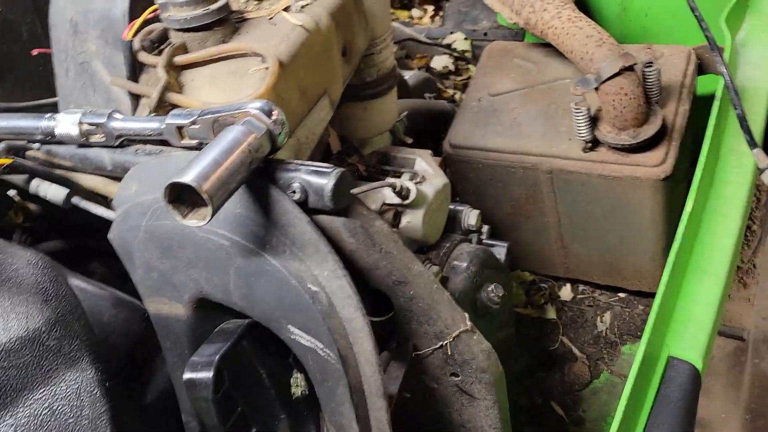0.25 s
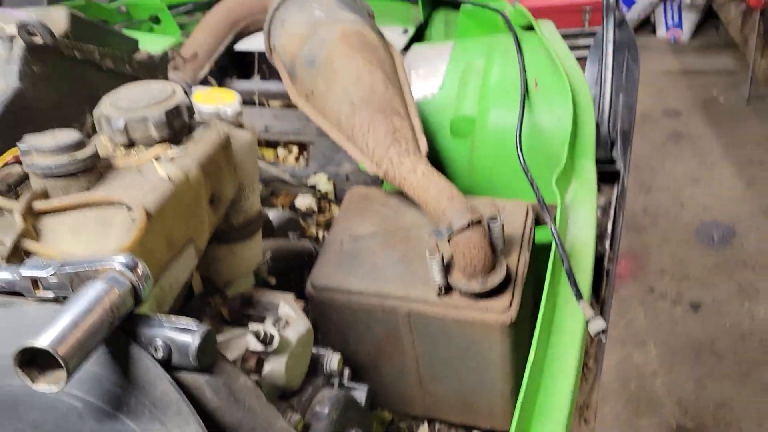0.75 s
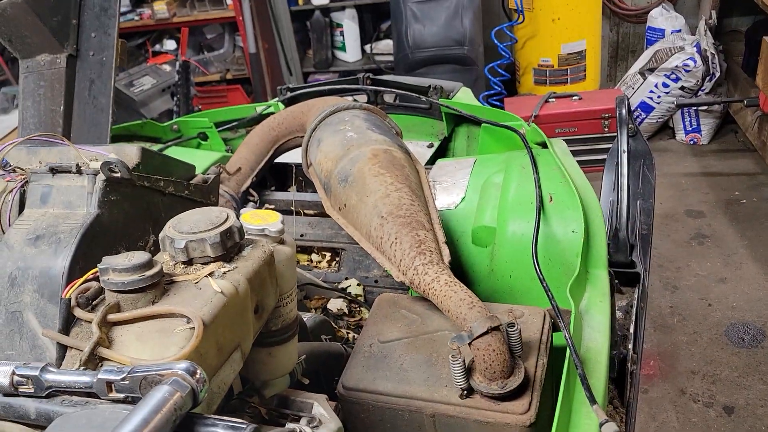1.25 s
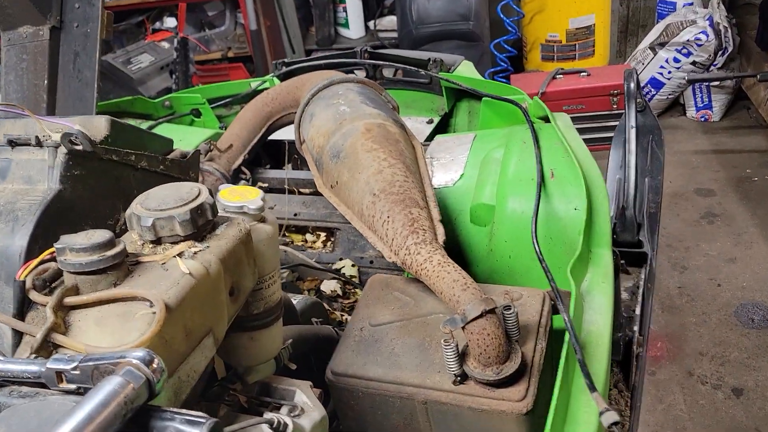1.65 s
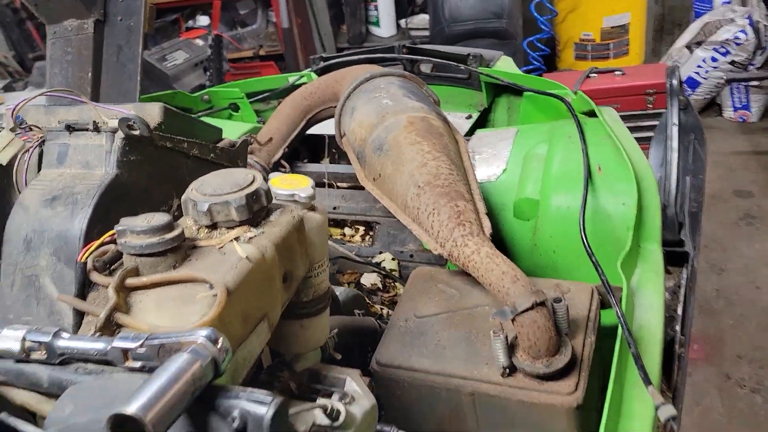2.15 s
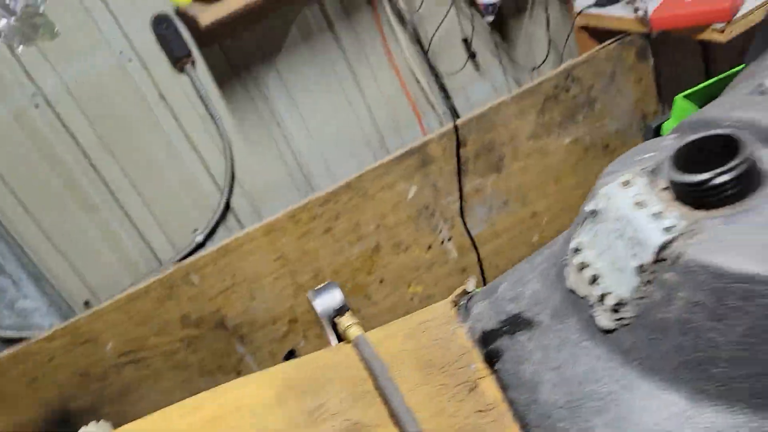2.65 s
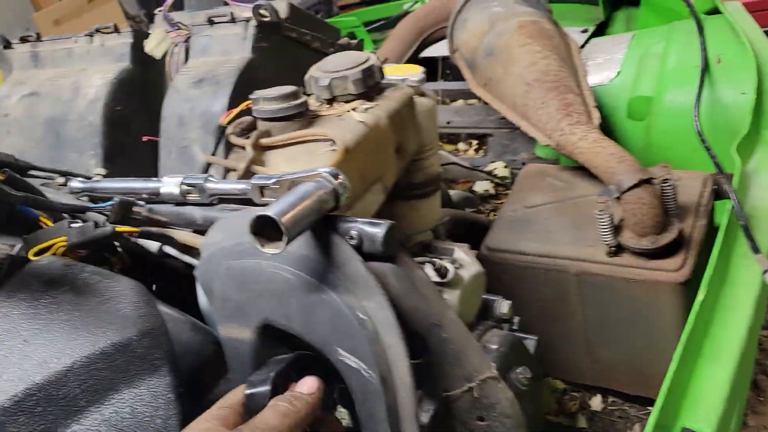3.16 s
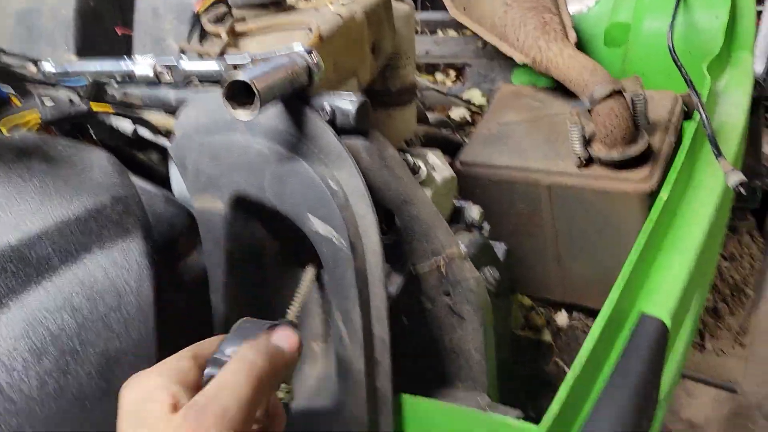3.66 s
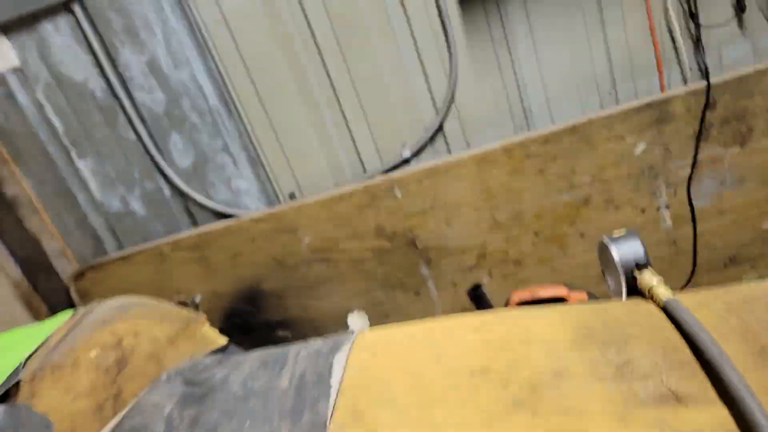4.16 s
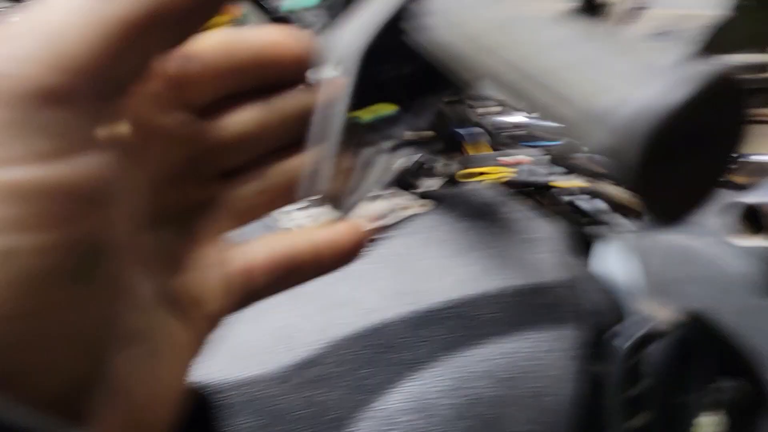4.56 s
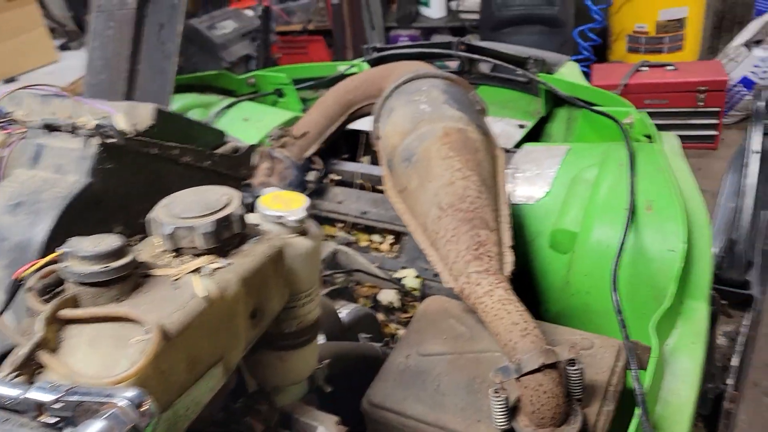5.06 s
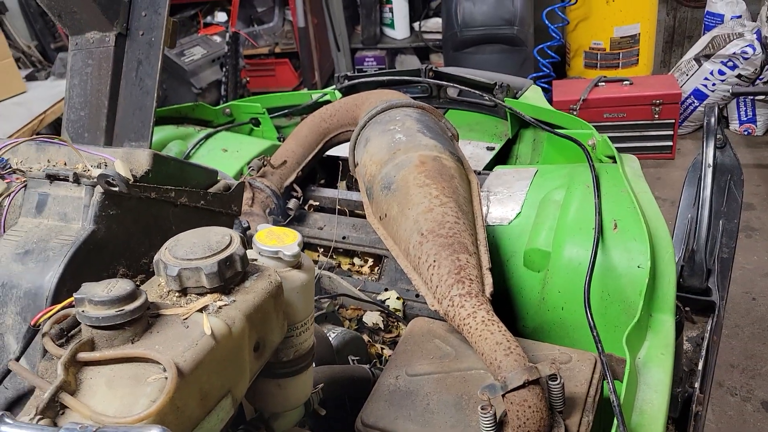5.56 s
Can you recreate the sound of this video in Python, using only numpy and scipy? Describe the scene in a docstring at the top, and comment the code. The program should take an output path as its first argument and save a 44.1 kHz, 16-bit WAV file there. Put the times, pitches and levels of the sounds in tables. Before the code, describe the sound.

In a workshop, heard very close in stereo, a two-stroke snowmobile engine runs raggedly from the start: hollow, uneven exhaust bangs, low airbox throb, dense metallic clatter and belt hiss, with a sharp snap at the very beginning. Around 0.9 seconds it falters, slowing into a few weak pulses and stalling by about 1.2. Quiet room air remains, with small knocks, dull bumps, faint rope rattle and a pawl clink near 2.0. At 2.4 the starter is pulled: the crank churns with deep thumps, rough honking intake gulps and rattling until about 3.3, without catching. The handle knocks at 3.4, then the rope rattles back with faint squeaks and dull bumps through 3.9. A second pull groans and churns from 4.05. Hard handle and tool knocks and dry snaps crack at 4.5 to 4.75; the engine catches around 4.65 and keeps banging unevenly, clattering and hissing, until the end at 5.8.

```python
"""In a workshop a twin two-stroke snowmobile, hood off, idles raggedly close to two microphones and stalls.
The recoil starter is pulled in vain, the rope rattling in its guide, and its handle snaps home.
A second pull spins the crank, the handle and tools knock hard, and the engine catches with uneven bangs.
Gas pulses ring the exhaust, piston strokes pump the airbox and shake the chassis; random metal taps
make the clatter of clutch and casing, filtered noise the belt hiss, and short noise blows the knocks."""
import sys
import numpy as np
from scipy import signal
from scipy.fft import rfft, irfft
from scipy.io import wavfile
from scipy.ndimage import uniform_filter1d

SR = 44100
rng = np.random.default_rng(int(sys.argv[2]) if len(sys.argv) > 2 else 0)


def generate_wav(signal):
    """Clip the signal to [-1, 1] and save it as 16-bit WAV at the path in sys.argv[1]."""
    frames = np.transpose(np.atleast_2d(signal))
    scaled = np.clip(frames, -1, 1) * 32767
    pcm = np.round(scaled).astype(np.int16)
    wavfile.write(sys.argv[1], SR, pcm)


N = 256220
T = np.arange(N) / SR
RING_T = T[:16384]  # time axis of one short event

# Levels in the tables are relative: each source trims its own mix.
# still air of the workshop: (frequency [Hz], level [dB])
SHOP_AIR = [(18, -29), (30, -12), (512, -6), (1010, -17.5), (5450, -15.5), (10200, -21.5), (12600, -16),
            (16000, -30.5)]
# crank speed, behind throb, drone and clatter: (time [s], piston strokes [1/s])
CRANK_SPEED = [(0, 30.6), (.2, 23.7), (.45, 39.2), (.62, 34.1), (.86, 28.8), (.97, 16.1), (1.14, 8.3),
               (1.38, 4), (1.62, 1.9), (2.405, 2.8), (2.45, 21.4), (2.65, 25.96), (3.03, 25.9), (3.22, 19),
               (3.48, 6.9), (3.8, 2.75), (4.015, 4.5), (4.06, 23.7), (4.35, 27.15), (4.7, 31.9),
               (5.81, 31.64)]
# how strongly the engine's running sound is present: (time [s], amount [0-1])
RUNNING_AMOUNT = [(0, 0.7), (.87, 0.85), (.95, 0.37), (4.56, 0.24), (4.68, 0.92), (5.81, 1)]
# strokes that fail to burn: (time [s], dip [dB])
MISFIRE_DIPS = [(.09, -11), (.595, -4.5), (4.795, -3.5), (4.945, -3), (5.112, -4), (5.22, -11), (5.272, -3),
                (5.41, -6), (5.745, -5)]
# the crank jerks, throws slack parts and rubs the belt: (time [s], extra clatter [dB], extra hiss [dB])
CRANK_JERKS = [(0.133, 8, 9.5), (0.227, 10, 8), (.32, 1, 5), (0.411, 0.5, 3.5), (.49, 1, 5), (.595, 2.5, 5),
               (.705, 3, 6), (.844, 3.5, 2.5), (2.39, 1.5, 7), (2.584, 9.5, 11), (2.674, 4, 7),
               (2.83, 1.5, 4.5), (2.91, 1.5, 2), (3.003, 9, 7), (3.19, 3, -0.5), (3.365, -1, 9),
               (4.128, 13, 14.5), (4.28, 9.5, 8.5), (4.434, 2, 2.5), (4.748, 6, 5), (4.831, 5.5, 6),
               (4.952, 8.5, 8.5), (5.06, 7, 7), (5.13, 3.5, 7), (5.23, 9, 6.5), (5.347, 8.5, 7.5),
               (5.545, 9, 10), (5.698, 9.5, 11.5)]
# the rope runs out or winds back: (start [s], end [s], start level [dB], end level [dB])
ROPE_TRAVEL = [(1.27, 1.3, -55, -50), (1.402, 1.457, -61, -48), (1.68, 1.785, -64, -73.5),
               (1.88, 2.07, -48, -49), (2.12, 2.23, -71, -60), (2.278, 2.428, -49, -31.5),
               (3.44, 3.706, -53.5, -43.5), (3.767, 3.869, -70, -57), (3.867, 4.027, -51.5, -29.5)]
# dull chassis bumps as the crank rocks back or the rope takes up: (time [s], level [dB])
CHASSIS_BUMPS = [(1.297, -26), (1.44, -26), (2.011, -24), (3.68, -16), (3.876, -22), (3.886, -25),
                 (3.896, -15), (3.906, -22)]
# hood-less chassis, shaken by the engine: (frequency [Hz], width [Hz], level [dB])
CHASSIS_MODES = [(179.2, 25, -1), (224.8, 49, 1), (266.1, 13.6, 5), (472.7, 17, -6.5), (595, 17, -8.5)]
# taut rope squeaking and groaning in its guide:
# (start [s], end [s], level [dB], start frequency [Hz], end frequency [Hz])
ROPE_SQUEAKS = [(3.634, 3.754, -40.5, 2610, 2570), (3.962, 4.018, -39, 3130, 3210),
                (3.97, 4.039, -27.5, 225.9, 286), (3.985, 4.038, -29, 400, 440),
                (4.166, 4.205, -30.5, 3200, 3170)]
# dry snaps close to the microphones: (time [s], peak level [dB], lower edge [Hz], upper edge [Hz])
CLOSE_SNAPS = [(0.0225, -9, 3200, 6100), (1.257, -36, 2900, 6500), (4.5544, -5.5, 2000, 7500),
               (4.6197, -10, 3600, 5330), (4.6367, -10.5, 2580, 5060), (4.7418, -9.5, 2720, 6050)]
# starter handle and loose tools knocking:
# (time [s], level [dB], lower edge [Hz], upper edge [Hz], chatter decay [s])
HANDLE_KNOCKS = [(1.148, -25, 600, 4340, 0.0055), (1.4392, -24.5, 494, 7350, 0.0062),
                 (2.307, -31, 905, 6080, 0.0012), (3.4226, -16.5, 555, 3700, 0.0062),
                 (3.571, -30.5, 391, 1300, .006), (3.679, -30, 500, 2600, .02),
                 (4.5291, -12, 600, 7050, 0.0088), (4.534, -8.5, 403, 1070, 0.03),
                 (4.555, -12.5, 800, 7500, 0.0064), (4.569, -15.5, 700, 5500, 0.011),
                 (4.62, -16, 2690, 4700, .008)]
# extra tone tilt laid over the band-limited knocks and their ringing: (frequency [Hz], level [dB])
KNOCK_TILT = [(150, 27.5), (600, 8.5), (950, 14), (2200, 10.5), (3300, 6.5), (5500, 4), (7500, -3.5),
              (10000, 5.5), (16000, 21)]
# steel tools ringing when knocked: (frequency [Hz], width [Hz], level over the knock [dB])
TOOL_MODES = [(931, 41, -1.5), (1400, 53, -4), (2640, 110, -4), (3170, 400, -2.5), (4350, 200, -11),
              (7200, 580, 8.5)]
# starter pawls clinking on their steel cup: (time [s], level [dB])
PAWL_CLINKS = [(1.986, -34.5), (2.016, -22), (2.673, -23), (2.692, -21), (2.72, -27), (3.666, -30.5),
               (3.677, -23.5)]
# tone tilt of the pawl contacts: (frequency [Hz], level [dB])
CLINK_TILT = [(60, 20.0), (200, 22.0), (1500, 17), (3000, 4.5), (6000, 5.5), (15000, -3.0)]
# starter cup: (frequency [Hz], width [Hz], level over the contact noise [dB])
CUP_MODES = [(2065, 60.7, 12.5), (2460, 10, 17), (2640, 280, 17), (5896, 25, 9), (7741, 13, 13),
             (9600, 30, 6), (11600, 43, 16), (13610, 48, 18)]
# where loose parts ring when they strike: (frequency [Hz], level [dB])
LOOSE_PART_MODES = [(1100, -1.5), (1385, 3.5), (1510, 1.5), (1780, -2), (2620, -9)]
# clutch and casing, tone of the rattle: (frequency [Hz], level [dB])
CASING_COLOUR = [(250, -17), (500, -5.5), (850, -10.5), (1080, 5.5), (1230, 2.5), (1420, 5.5), (2200, -4),
                 (2650, -5), (4000, -13), (5400, -12.5), (6600, -23.5), (16000, -53.5)]
# panels and casing ringing with the rattle: (frequency [Hz], width [Hz], level over the rattle [dB])
CASING_MODES = [(476, 24, 14), (604, 44, 8.5), (692, 42, 6), (1379, 7.6, -2), (1864, 12, 1), (2670, 14, -4),
                (3160, 18, 2.5)]
# rubbing belt and clutch: (frequency [Hz], level [dB])
BELT_COLOUR = [(1500, 4.5), (7000, -3.5), (10500, -6.5), (12700, 2), (16000, -8)]
# hardest gulps of the cranked engine: (time [s], honk level [dB], thump level [dB])
INTAKE_GULPS = [(2.455, -31, -22), (2.527, -42, -17), (2.618, -23.5, -22), (2.708, -24, -15),
                (2.864, -21.5, -19), (3.045, -26, -30), (4.068, -30, -20), (4.135, -28, -15),
                (4.168, -21.5, -17), (4.313, -15, -13.5), (4.468, -17.5, -16)]
# airbox and belly pan, pumped by the pistons: (frequency [Hz], width [Hz], level [dB])
AIRBOX_MODES = [(64.7, 10, 6), (97.2, 10.7, 8)]
# single bangs or evenly spaced runs of bangs:
# (one end [s], other end [s], level at the one end [dB], level at the other end [dB])
BANG_RUNS = [(0.109, .11, -16, -17), (0.131, 0.165, -26, -18.5), (0.2549, .2935, -13, -9.5),
             (.33, .33, -19, -17), (.369, .4567, -9, -11), (.485, .5395, -16, -22),
             (0.6187, .674, -16.5, -18.5), (0.7758, .8041, -19.5, -13.5), (0.8454, .8457, -5, -5.5),
             (0.8944, .8944, -17.5, -17), (.968, 0.91, -28.5, -27), (1.055, 1.056, -32.5, -26),
             (4.661, 4.694, -15, -12.5), (4.82, 4.883, -20.5, -15), (4.915, 4.974, -22, -26),
             (5.0, 5.0291, -10, -9), (5.059, 5.059, -17, -17), (5.1468, 5.172, -17, -17.5),
             (5.2578, 5.2578, -20, -17), (5.287, 5.345, -17.5, -10), (5.438, 5.438, -18.5, -24),
             (5.47, 5.5041, -9, -11), (5.543, 5.622, -18.5, -25), (5.6494, 5.6891, -14, -12),
             (5.7776, 5.801, -21, -11.5)]
# exhaust pipe and silencer: (frequency [Hz], width [Hz], level [dB])
PIPE_MODES = [(98.1, 3.4, 25), (134, 42, 15), (217, 13.6, 23.5), (355, 22, 5.5), (430, 32, 12),
              (468, 37, 12.5), (611, 29, 13)]
# placing of the bright sounds: (frequency [Hz], left minus right [dB])
BRIGHT_PAN = [(700, -1), (1290, -2.5), (2380, -7), (4400, -11), (8120, 5.5), (13000, -3.5)]
# left-right difference of the low sounds: (frequency [Hz], level [dB])
LOW_SIDE = [(60, -19.5), (200, -19.0), (400, -7.0), (800, -25.5)]

REFERENCE_SPEED = 25  # strokes per second
# base level at the reference speed (dB), growth (dB per doubling of speed)
THROB_DB, THROB_GROWTH_DB = -25.5, 10
DRONE_DB, DRONE_GROWTH_DB = -22.5, 12
CLATTER_DB, CLATTER_GROWTH_DB = -26.5, 17.5
SETTLE_DB = -12.5  # loose parts rattle less under a full running sound
THROB_LAG_S = 0.0084  # the airbox takes a moment to build up
STROKE_S = .03  # approximate spacing of bangs in a run
BANG_HZ, BANG_DB, HARDER_HZ_PER_DB = 284, -11, 6.5  # a stronger bang is a shorter pulse
ROPE_ATTACK_S, ROPE_RELEASE_S, ROPE_SHAKE_DB = 0.019, 0.051, 6.5
WHIRR_DB = -6.5  # whirr of the rope guide, relative to its rattle
TOP_HZ = 15950  # upper limit of the microphones


def undb(db):
    """Decibels to gain."""
    return 10 ** (np.asarray(db) / 20)


def power_sum(a_db, b_db):
    """Level of two unrelated sounds together."""
    return 20 * np.log10(np.hypot(undb(a_db), undb(b_db)))


def curve(table):
    """Second column of a table, joined by straight lines in time."""
    times, values = np.transpose(table)
    return np.interp(T, times, values)


def unit(x):
    """Scale to rms 1."""
    return x / np.sqrt(np.mean(x ** 2))


def steady(x, span_s):
    """Scale to about rms 1 over a sliding span, keeping the faster pulses."""
    power = np.mean(np.atleast_2d(x) ** 2, axis=0)
    size = max(int(span_s * SR), 2)
    smooth = uniform_filter1d(uniform_filter1d(power, size), size)
    return x / np.sqrt(smooth + 1e-6 * power.mean())


def drift(span_s):
    """Smooth chance with a spread of 1, changing over about span_s."""
    size = max(int(span_s * SR), 2)
    return unit(uniform_filter1d(uniform_filter1d(rng.standard_normal(N), size), size))


def colour(x, points):
    """Filter by a curve of (frequency [Hz], level [dB]) points."""
    hz, db = np.transpose(points)
    f = np.maximum(np.fft.rfftfreq(x.shape[-1], 1 / SR), 1)
    gain = undb(np.interp(np.log(f), np.log(hz), db))
    return irfft(rfft(x) * gain, x.shape[-1])


def ring(x, modes):
    """Sum of resonances (frequency [Hz], width [Hz], level [dB])."""
    return sum(undb(db) * signal.lfilter(*signal.iirpeak(hz, hz / width, fs=SR), x)
               for hz, width, db in modes)


def passband(x, lo_hz, hi_hz, order=2):
    """Keep the band between two edges."""
    edges = [lo_hz, min(hi_hz, SR / 2 - 1)]
    return signal.sosfilt(signal.butter(order, edges, "band", fs=SR, output="sos"), x)


def scatter(x, t60, wet_db):
    """Direct sound plus dense, dying reflections that differ at the two microphones."""
    envelope = undb(-60 * RING_T / t60) * (1 - np.exp(-RING_T / .003))
    tail = rng.standard_normal((2, len(RING_T))) * envelope
    tail /= np.sqrt(np.sum(tail ** 2, axis=1, keepdims=True))
    wet = undb(wet_db)
    reflected = signal.fftconvolve(np.atleast_2d(x), tail, axes=1)[:, :N]
    return (x + wet * reflected) / np.sqrt(1 + wet ** 2)


def add(track, s, sound):
    """Mix a sound in at time s."""
    i = max(int(s * SR), 0)
    track[i:i + len(sound)] += sound[:N - i]


def contact(decay_s):
    """A noisy blow that builds over a tenth of its decay time and chatters out."""
    bite = 1 - np.exp(-RING_T / (decay_s / 10))
    return rng.standard_normal(len(RING_T)) * bite * np.exp(-RING_T / decay_s)


def strokes(unevenness=.12):
    """One pulse per piston stroke, and the time since the last one; the crank turns unevenly."""
    wander = unit(uniform_filter1d(rng.standard_normal(N), size=1500))
    turns = np.cumsum(curve(CRANK_SPEED) * np.exp(unevenness * wander)) / SR
    pulses = np.diff(np.floor(turns), prepend=0)
    return pulses, T - np.maximum.accumulate(pulses * T)


def jerk_db(jerk_s=0.069, rub_s=0.065):
    """Each jerk lifts the rattling and the hiss (dB), and both then sag."""
    jerks, rubs = np.zeros((2, N))
    for s, clatter_db, hiss_db in CRANK_JERKS:
        add(jerks, s, clatter_db * np.exp(-RING_T / jerk_s))
        add(rubs, s, hiss_db * np.exp(-(RING_T / rub_s) ** 2))
    return jerks, rubs


def misfire_db(width_s=0.019):
    """Dips (dB) in the running sound where strokes fail to burn."""
    return sum(db * np.exp(-((T - s) / width_s) ** 2) for s, db in MISFIRE_DIPS)


def rope():
    """Levels (dB) of starter rattle and guide whirr: each rope run sets in, changes level and dies away."""
    rattle = np.full(N, 1e-6)
    for start, end, start_db, end_db in ROPE_TRAVEL:
        attack = np.clip((T - start) / ROPE_ATTACK_S, 0, 1)
        release = np.exp(-np.maximum(T - end, 0) / ROPE_RELEASE_S)
        rattle = rattle + attack * release * undb(np.interp(T, [start, end], [start_db, end_db]))
    rattle_db = 20 * np.log10(rattle)
    return rattle_db, rattle_db + WHIRR_DB


def workshop(floor_db=-67):
    """Faint steady air of the room: coloured noise, scattered to both microphones."""
    air = colour(rng.standard_normal(N), SHOP_AIR)
    return undb(floor_db) * unit(scatter(air, 0.22, 0))


def bumps(bump_db=1.0):
    """Short, dull blows ring the chassis."""
    blows = np.zeros(N)
    for s, db in CHASSIS_BUMPS:
        add(blows, s, undb(db) * contact(0.0028))
    thuds = 2 * ring(blows, CHASSIS_MODES) + 2 * passband(blows, 330, 570, order=1)
    return undb(bump_db) * passband(thuds, 130, 1700)


def squeaks(attack_s=.015, release_s=0.03, waver=0.024, rough_db=4):
    """The rope squeaks or groans in its guide: one rough, sliding tone each time."""
    out = np.zeros(N)
    for start, end, db, start_hz, end_hz in ROPE_SQUEAKS:
        hz = np.interp(T, [start, end], [start_hz, end_hz]) * (1 + waver * drift(0.0019))
        gate = np.clip((T - start) / attack_s, 0, 1) * np.exp(-np.maximum(T - end, 0) / release_s)
        out += undb(db) * gate * np.sin(2 * np.pi * np.cumsum(hz) / SR)
    return scatter(out * undb(rough_db * drift(0.005)), 0.17, -0.5)


def snaps(snap_db=0, decay_s=0.00055):
    """Close, dry snaps: band-limited contact noise with hardly any tail."""
    out = np.zeros(N)
    for s, db, lo_hz, hi_hz in CLOSE_SNAPS:
        click = passband(contact(decay_s), lo_hz, hi_hz)
        add(out, s, undb(db + snap_db) * click / np.abs(click).max())
    return scatter(out, 0.0079, -4)


def starter(knock_db=-4, clink_db=-10):
    """Blows of the handle and loose tools ring steel; the pawls clink on their resonant cup."""
    knocks, clinks = np.zeros((2, N))
    for s, db, lo_hz, hi_hz, decay_s in HANDLE_KNOCKS:
        add(knocks, s, undb(db) * passband(contact(decay_s), lo_hz, hi_hz))
    for s, db in PAWL_CLINKS:
        add(clinks, s, undb(db) * contact(0.0083))
    knocks = colour(knocks + ring(knocks, TOOL_MODES), KNOCK_TILT)
    clinks = colour(clinks, CLINK_TILT)
    hits = undb(knock_db) * knocks + undb(clink_db) * (clinks + ring(clinks, CUP_MODES))
    return scatter(hits, 0.25, -0.98)


def clanks(level_db, clank_db=-2.0, running_db=-5, per_s=190, spread_db=4, decay_s=0.011, detune=0.03):
    """Single loose parts strike the casing, each with its own strength and a short ring near a mode."""
    out = np.zeros((2, N))
    t = RING_T[:3000]
    for when, which, size, tune, side in rng.random((int(per_s * N / SR), 5)):
        hz, db = LOOSE_PART_MODES[int(which * len(LOOSE_PART_MODES))]
        strength = undb(db + spread_db * min(-np.log(1 - size), 2))
        part_hz = hz * (1 + detune * (2 * tune - 1))
        note = strength * np.exp(-t / decay_s) * np.sin(2 * np.pi * part_hz * t)
        # the left share may be of either sign
        for channel, share in zip(out, (np.cos(np.pi * side), np.sin(np.pi * side))):
            add(channel, when * N / SR, share * note)
    gain = undb(level_db + clank_db + running_db * curve(RUNNING_AMOUNT))
    return steady(passband(out, 700, 6000), 0.086) * gain


def clatter(age, clatter_db, whirr_db, jerks, rubs, taps_db=-0.5, grain_db=1.0, taps_per_s=1000,
            chug_s=0.02, bunch_db=0.6, bunch_s=0.016, hiss_db=-23, hiss_slope=0.59,
            rope_hz=3230, rope_width_hz=450):
    """Dense metal taps, in clusters and louder after each stroke, with belt hiss and rope whirr."""
    shape = (3, N)
    sizes = undb(grain_db * np.minimum(rng.exponential(size=shape), 3))
    struck = rng.random(shape) < taps_per_s / SR
    taps = struck * rng.choice([-1, 1], shape) * sizes * (1 + np.exp(-age / chug_s))
    bunches = unit(uniform_filter1d(rng.standard_normal(N), size=max(int(bunch_s * SR), 2)))
    taps = taps * undb(bunch_db * bunches)
    # parts all over the bay rattle: only some reach both microphones alike
    taps = taps[:2] + .4 * taps[2]
    metal = steady(colour(taps + ring(taps, CASING_MODES), CASING_COLOUR), 0.089)
    rubbing = rng.standard_normal((2, N))
    whirr = unit(ring(rubbing, [(rope_hz, rope_width_hz, 0)])) * undb(whirr_db)
    # the hiss follows the slow swell gently and the jerks sharply
    hiss = unit(colour(rubbing, BELT_COLOUR)) * undb(hiss_db + hiss_slope * clatter_db + rubs)
    return metal * undb(clatter_db + jerks + taps_db) + whirr + hiss


def gulps(hz=560, length_s=0.014, rise_per_s=2.5, waver=0.11, thump_hz=62, thump_s=0.02):
    """A hard gulp heaves the airbox for a few deep cycles; the intake honks, a rough tone bending upward."""
    out = np.zeros(N)
    rough = waver * drift(0.00197)
    for s, honk_db, thump_db in INTAKE_GULPS:
        t = T - s
        pitch = hz * (1 + rise_per_s * np.clip(t, -length_s, length_s) + rough)
        honk = np.exp(-(t / length_s) ** 2) * np.sin(2 * np.pi * np.cumsum(pitch) / SR)
        thump = np.exp(-(t / thump_s) ** 2) * np.cos(2 * np.pi * thump_hz * t)
        out += undb(honk_db) * honk - undb(thump_db) * thump
    return out


def pumping(pulses, age, throb_db, drone_db, gulp_db=0, running_db=-7, running_throb_db=-7.0):
    """Strokes gulp air through the airbox and shake the chassis; both ease as the running sound grows."""
    running = curve(RUNNING_AMOUNT)
    breath = unit(rng.standard_normal(N) * np.exp(-age / 0.15)) * undb(gulp_db) + unit(pulses)
    air = steady(passband(ring(breath, AIRBOX_MODES), 12, 136), 0.064)
    shake = rng.standard_normal(N) * (.5 + np.exp(-age / 0.016))
    body = steady(passband(ring(shake, CHASSIS_MODES), 100, 790), 0.023)
    throb = air * undb(throb_db + running_throb_db * running)
    return throb + body * undb(drone_db + running_db * running)


def firings():
    """Time and level of each bang; within a run they come evenly and their level moves evenly in dB."""
    for one_s, other_s, one_db, other_db in BANG_RUNS:
        count = int(round(abs(other_s - one_s) / STROKE_S)) + 1
        yield from zip(np.linspace(one_s, other_s, count), np.linspace(one_db, other_db, count))


def gas_pulse(hz):
    """The pressure swing of one blow-down, centred in 512 samples."""
    u = (np.pi * hz * (np.arange(512) - 256) / SR) ** 2
    return (2 * u - 1) * np.exp(-u)


def pipe(gas, sway_s=0.00048, sway_span_s=0.031):
    """The exhaust rings; its pitch sways with the hot gas inside."""
    late = T - sway_s * drift(sway_span_s)
    return np.interp(late, T, ring(gas, PIPE_MODES))


def exhaust(pulses, age, doublings, idle_db=-34, bang_db=-2.5, direct_db=-2, crack_db=-19,
            weak_hz=260, growth_db=11):
    """Strong bangs stand out of a train of half-burnt strokes; all ring the same pipe."""
    bangs, cracks = np.zeros((2, N))
    for s, db in firings():
        pulse = gas_pulse(BANG_HZ + HARDER_HZ_PER_DB * (db - BANG_DB))
        add(bangs, s - len(pulse) / 2 / SR, undb(db) * pulse)
        add(cracks, s, undb(db) * contact(0.015))
    weak = np.convolve(pulses * undb(1.1 * rng.standard_normal(N)), gas_pulse(weak_hz), "same")
    gas = passband(rng.standard_normal(N) * np.exp(-age / 0.0092), 150, 440)
    idle = steady(weak + pipe(weak), 0.11) + steady(gas + pipe(gas), 0.12)
    idle_gain = undb(idle_db + growth_db * doublings + misfire_db()) * curve(RUNNING_AMOUNT)
    strong = undb(bang_db) * (undb(direct_db) * bangs + pipe(bangs))
    strong = strong + undb(crack_db) * passband(cracks, 397, 2800, order=1)
    return strong + idle * idle_gain


def scene(shake_share=0.65):
    """Crank speed drives the engine; bass fills the bay evenly, bright metal lies mostly to the right."""
    doublings = np.log2(np.maximum(curve(CRANK_SPEED), 1) / REFERENCE_SPEED)
    pulses, age = strokes()
    jerks, rubs = jerk_db()
    rope_db, whirr_db = rope()

    throb_db = THROB_DB + THROB_GROWTH_DB * np.interp(T - THROB_LAG_S, T, doublings)
    drone_db = power_sum(DRONE_DB + DRONE_GROWTH_DB * doublings, rope_db + ROPE_SHAKE_DB)
    drone_db = drone_db + shake_share * jerks + misfire_db() / 2
    engine_rattle_db = CLATTER_DB + CLATTER_GROWTH_DB * doublings + SETTLE_DB * curve(RUNNING_AMOUNT)
    clatter_db = power_sum(engine_rattle_db, rope_db)

    low = bumps() + gulps() + pumping(pulses, age, throb_db, drone_db) + exhaust(pulses, age, doublings)
    left, right = scatter(low, 0.078, -2.5)
    # long waves reach both microphones alike
    side = colour(left - right, LOW_SIDE)

    bright = squeaks() + snaps() + starter() + clanks(clatter_db + jerks)
    bright = bright + clatter(age, clatter_db, whirr_db, jerks, rubs)
    placed = [colour(x, [(hz, sign * db / 2) for hz, db in BRIGHT_PAN])
              for x, sign in zip(bright, (1, -1))]
    return workshop() + np.array([low + side, low - side]) + np.array(placed)


def record(dry):
    """The microphones round the loudest peaks and cut the top."""
    rounded = np.tanh(dry)
    return signal.sosfilt(signal.ellip(10, .2, 80, TOP_HZ, fs=SR, output="sos"), rounded)


dry = scene()
out = record(dry)
generate_wav(out)
```